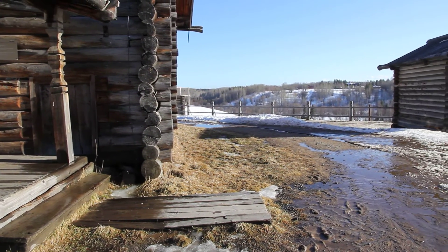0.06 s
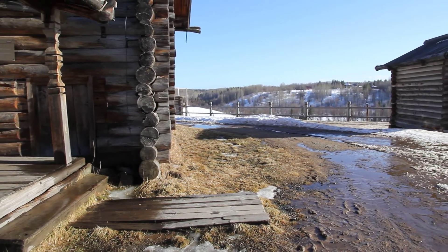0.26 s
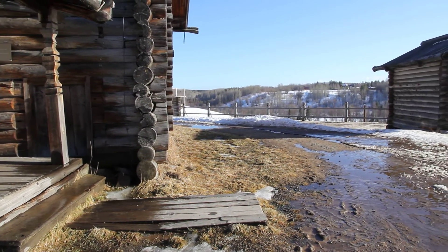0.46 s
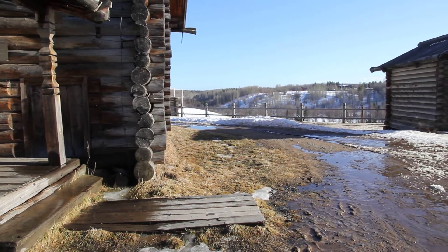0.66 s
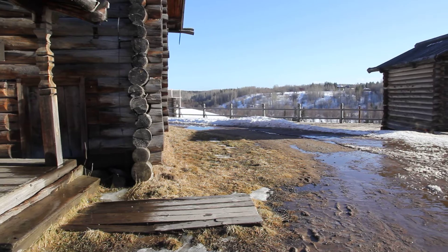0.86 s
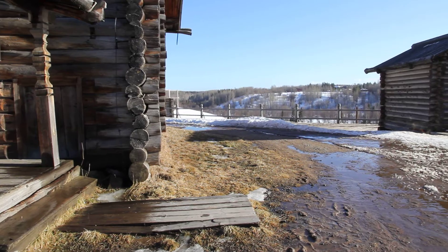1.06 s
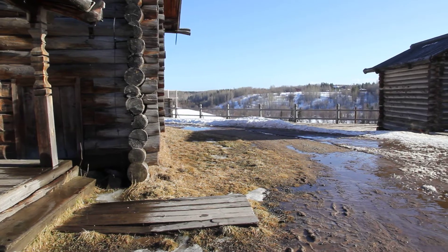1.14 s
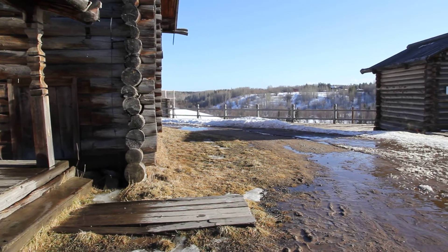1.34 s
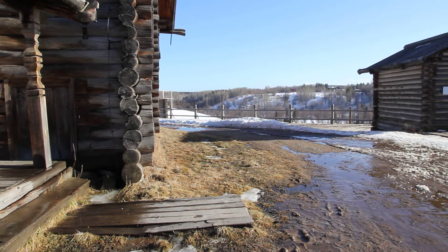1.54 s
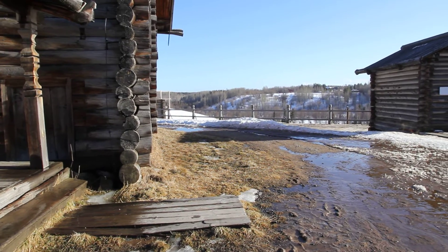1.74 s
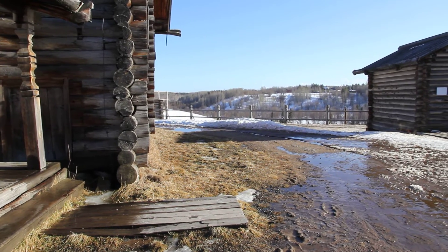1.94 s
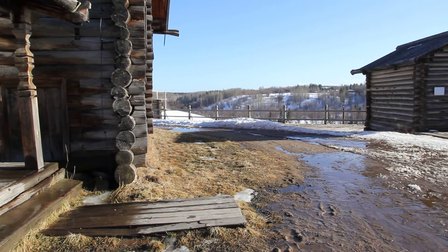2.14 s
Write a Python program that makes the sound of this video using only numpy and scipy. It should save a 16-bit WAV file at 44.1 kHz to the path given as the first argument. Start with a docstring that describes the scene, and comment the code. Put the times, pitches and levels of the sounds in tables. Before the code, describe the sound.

Water drips irregularly throughout, with sharp little taps on wet boards and soft splashes on soaked ground, over a fine patter and faint outdoor hiss. From about 0.2 to 0.9 seconds a gust buffets the microphone, with one loud dull pop near 0.5 seconds, then eases to a low rumble. The drips continue, the clearest taps falling around 1.2, 1.5, 1.9 and 2 seconds.

```python
"""Meltwater in a muddy yard

Water drips from the roof of a log building. Near drops tap sharply on wet boards, which ring briefly;
others splash softly on soaked ground, amid a fine patter of droplets. In the first second a gust
buffets the microphone, with one dull pop, then eases to a low rumble. Faint open-air hiss lies behind."""
import sys
import numpy as np
from scipy import signal
from scipy.fft import rfft, irfft, next_fast_len
from scipy.io import wavfile
from scipy.ndimage import uniform_filter1d, map_coordinates

SR = 44100
rng = np.random.default_rng(int(sys.argv[2]) if len(sys.argv) > 2 else 0)


def inscribe(sig):
    """Save sig as 16-bit PCM at rate SR to the path in sys.argv[1].

    A 1-D sig is mono; a 2-D sig holds one channel per row.
    Samples are clipped to [-1, 1] before scaling.
    """
    pcm = np.round(np.clip(np.atleast_2d(sig).T, -1, 1) * 32767)
    wavfile.write(sys.argv[1], SR, pcm.astype(np.int16))


N = 97020  # 2.2 s


def amp(db):
    return 10 ** (np.asarray(db) / 20)


def unit_rms(x):
    return x / np.sqrt(np.mean(x ** 2) + 1e-20)


def colour(points):
    """An EQ curve through (Hz, dB) points on a log axis."""
    freqs, gains_db = np.transpose(points)
    return lambda hz: amp(np.interp(np.log(hz + 1), np.log(freqs + 1), gains_db))


def bell(hz, centre, octaves, edge=2):
    """A bell EQ on a log axis; a higher edge steepens its sides."""
    return np.exp(-.5 * np.abs(np.log2((hz + 1) / centre) / octaves) ** edge)


def filtered(x, gain):
    """x through the EQ curve gain(hz)."""
    size = next_fast_len(len(x) + 4096)
    return irfft(rfft(x, size) * gain(np.fft.rfftfreq(size, 1 / SR)), size)[:len(x)]


def noise(points, size):
    """Coloured noise of rms 1."""
    return unit_rms(filtered(rng.standard_normal(size), colour(points)))


def wobble(rate):
    """A smooth random curve, rate knots a second."""
    return map_coordinates(rng.standard_normal(N // 100), [np.arange(N) * rate / SR], mode="wrap")


def patchy(x, depth_db):
    """x with patches of random gain over pitch and time, at rms 1."""
    spectra = signal.stft(x, nperseg=256)[2]
    patches = uniform_filter1d(rng.standard_normal(spectra.shape), size=4, axis=0)
    patches = unit_rms(uniform_filter1d(patches, size=6, axis=1))
    return unit_rms(signal.istft(spectra * amp(depth_db * patches), nperseg=256)[1][:len(x)])


def droplets(per_s, size, spread_db=0.5):
    """Tiny impacts of scattered strength at random moments."""
    hits = rng.random(size) < per_s / SR
    polarity = np.sign(rng.standard_normal(size))
    strength = amp(spread_db * np.clip(rng.standard_normal(size), -2, 2))
    return unit_rms(hits * polarity * strength)


def add(out, start_s, x):
    """Mix x into out from start_s on."""
    i = int(np.clip(round(start_s * SR), 0, N - 1))
    out[i:i + len(x)] += x[:N - i]


# The tone of the open air. Each row: frequency in Hz, gain in dB.
AIR_EQ = [(180, -9), (300, -0.5), (593, -5), (737, -3.5), (1780, -11), (2250, -16.5), (3520, -17.5),
          (3760, -20.5), (8500, -24.5), (14500, -34), (16000, -35)]


def air():
    """A faint, gently shifting bed of hiss from the open yard."""
    return amp(-59.5) * patchy(noise(AIR_EQ, N), depth_db=2)


# The gust's contour. Each row: time in seconds, rumble level in dB.
GUST = [(0, -42), (.19, -44.5), (.25, -38.5), (.37, -41.5), (.45, -45), (0.491, -34), (.56, -33.5),
        (.66, -38.5), (.77, -41.5), (.87, -40), (.92, -47.5), (1.02, -44.5), (1.09, -53), (1.15, -48),
        (1.48, -49), (1.57, -47.5), (1.63, -49), (1.85, -50.5), (2.13, -50.5), (2.19, -39.5)]
# The tone of the deep rumble and of the smaller eddies. Each row: frequency in Hz, gain in dB.
RUMBLE_EQ = [(20, -25), (35, 0), (55, 1), (85, 2), (130, -1.5), (200, -8.5), (300, -16.5), (450, -26.5),
             (800, -42), (2000, -63.5)]
EDDY_EQ = [(60, 29), (150, 13), (270, -0.5), (380, -5.5), (500, -2), (800, -30.5), (1500, -33.5),
           (3000, -134)]


def wind():
    """Rumble on the microphone; smaller eddies grow faster as the gust rises."""
    eddy_growth, flicker_db = 1.62, 1.5
    rumble_db = np.interp(np.arange(N) / SR, *np.transpose(GUST))
    mean_db = rumble_db.mean()
    eddy_db = mean_db - 15.5 + eddy_growth * (rumble_db - mean_db)
    eddies = unit_rms(noise(EDDY_EQ, N) * amp(flicker_db * wobble(45)))
    return amp(rumble_db) * noise(RUMBLE_EQ, N) + amp(eddy_db) * eddies


# Low thumps of wind. Each row: time in seconds, level in dB, pitch in Hz, half length in seconds,
# turbulence relative to the push in dB.
BUFFET_CUES = [(0.216, -33, 112, 0.0035, -16), (.249, -30.5, 153, 0.0037, -39),
               (0.292, -35, 230, 0.0025, -30), (.4133, -24, 129.6, 0.0067, -25.5),
               (.4195, -35.5, 274, 0.0036, -38), (0.4842, -29, 111, 0.0031, -5.5),
               (0.6036, -30.5, 285, 0.0028, -3), (.6265, -24, 174, 0.003, -26),
               (.6602, -28, 223, 0.0034, -23), (0.713, -33, 193, 0.0061, -31),
               (0.744, -33, 157, 0.0057, -30), (.7790, -33.5, 123, 0.0075, -28),
               (0.871, -33.5, 139, 0.0046, -12), (1.566, -38, 73, .012, -31),
               (2.181, -40.5, 96, 0.0045, -9.5)]
# The tone of that turbulence. Each row: frequency in Hz, gain in dB.
TURBULENCE_EQ = [(100, 14), (300, 10), (600, 2), (950, -5), (1300, -33), (3000, -58)]


def buffets():
    """Single eddies shake the microphone: a cycle or two of pressure with turbulence on it."""
    out, t = np.zeros(N), np.arange(N) / SR
    turbulence = noise(TURBULENCE_EQ, N)
    for at, db, hz, half_length, turbulence_db in BUFFET_CUES:
        push = np.sin(2 * np.pi * hz * (t - at))
        swell = np.exp(-((t - at) / half_length - .5) ** 2)
        out += amp(db) * (push + amp(turbulence_db) * turbulence) * swell
    return out


# The pop's dull, bass-heavy tone. Each row: frequency in Hz, gain in dB.
POP_EQ = [(20, -14), (50, -15), (90, 6), (170, -1), (300, -1), (400, -5.5), (490, -15), (580, -12),
          (720, -26), (1200, -31), (1800, -37), (2400, -77), (4000, -83)]


def wind_pop():
    """At the gust's peak the pressure flips from suction to push."""
    kick = np.zeros(N)
    add(kick, start_s=.536, x=np.ones(1))
    flip = filtered(kick, lambda hz: -1j * colour(POP_EQ)(hz))  # 90 degree shift: a dip, then a peak
    return amp(-12) * flip / np.abs(flip).max()


# The patter's thin, bright tone. Each row: frequency in Hz, gain in dB.
PATTER_EQ = [(500, -83), (2000, -0.5), (5000, 2), (9000, -1), (16000, -14)]


def patter():
    """Faint droplets all along the eaves."""
    return amp(-71.5) * unit_rms(filtered(droplets(per_s=400, size=N), colour(PATTER_EQ)))


# Drops on wet ground. Each row: start in seconds, level in dB, attack in seconds, decay in seconds,
# band centre in Hz, band width in octaves.
SPLASH_CUES = [(.007, -49.5, 0.0025, 0.0093, 8100, 1.4), (0.085, -53.5, 0.0062, 0.009, 4900, 1.5),
               (0.129, -51.5, 0.0072, 0.025, 4540, 0.52), (.131, -63, 0.0023, 0.0054, 11000, 0.66),
               (0.28, -55.5, 0.016, 0.032, 5100, 0.46), (.297, -47.5, .002, 0.0057, 6700, 1.1),
               (0.566, -53.5, 0.0026, 0.021, 6000, 1.1), (.745, -62.5, 0.0025, 0.018, 7240, 0.63),
               (.821, -54.5, 0.0089, 0.04, 6600, 1.5), (.852, -52, 0.0028, 0.0083, 6960, .7),
               (0.981, -63.5, 0.0019, 0.0076, 6000, .5), (1.06, -60, 0.008, .005, 7140, .8),
               (1.226, -59, 0.0012, 0.023, 10000, 2.1), (1.264, -55, 0.0033, 0.0065, 8500, 0.38),
               (1.295, -48.5, 0.0056, 0.0047, 8100, .7), (1.413, -59, 0.0081, 0.037, 5530, 0.45),
               (1.441, -57.5, 0.015, 0.014, 8100, 0.22), (1.575, -57.5, 0.0075, 0.0058, 6700, .6),
               (1.643, -57, 0.0021, 0.037, 1920, 0.83), (1.68, -57, .012, 0.015, 6500, 0.35),
               (1.814, -58.5, 0.005, .012, 7300, 0.61), (1.927, -63, 0.013, 0.017, 7900, .28),
               (2.052, -60, 0.0026, 0.0074, 6000, 0.62), (2.128, -62.5, 0.014, 0.012, 4960, 1),
               (2.166, -51.5, 0.0019, .011, 5560, 0.67)]


def splashes():
    """A drop bursts on soaked ground into a swelling, fading shower of droplets."""
    mist_share, skirt_db, lowpass_hz = 0.2, -12, 13600
    out, t = np.zeros(N), np.arange(SR // 4) / SR
    for start, db, attack, decay, centre, octaves in SPLASH_CUES:
        grains = np.sqrt(1 - mist_share) * droplets(per_s=1100, size=len(t))
        mist = np.sqrt(mist_share) * rng.standard_normal(len(t))
        tone = lambda hz: (bell(hz, centre, octaves) + amp(skirt_db)) / np.sqrt(1 + (hz / lowpass_hz) ** 10)
        shower = patchy(filtered(grains + mist, tone), depth_db=3.5)  # droplets cluster in pitch and time
        envelope = np.minimum(t / attack, 1) * np.exp(-np.maximum(t - attack, 0) / decay)
        add(out, start, amp(db) * shower * envelope)
    return out


# Drops on boards. Each row: start in seconds, level in dB, ring pitch in Hz, ring relative to the
# crack in dB, ring width in octaves, crack decay in milliseconds.
TAP_CUES = [(0.0682, -44, 5800, 3, 0.029, 0.81), (.0812, -46.5, 4800, 2, 0.29, 2),
            (0.2097, -52.5, 6230, 11.5, 0.5, 0.53), (0.2995, -54.5, 4150, 6, 0.34, 1.8),
            (.3655, -57, 7440, 3, 0.13, 0.55), (0.4572, -44.5, 2530, -26, 0.15, 1.65),
            (0.4951, -51.5, 3970, -6, 0.64, 0.23), (.6560, -56.5, 4630, -1, 0.16, 3.1),
            (0.8188, -44, 1950, 1, 0.58, 1.3), (0.8585, -52.5, 5340, 1, 0.44, 6.3),
            (0.9429, -51.5, 6100, -0.5, 0.52, 0.53), (0.9784, -51, 4640, -0.5, 0.24, 0.73),
            (1.1625, -45, 7000, -17, .3, 0.19), (1.1883, -40.5, 9900, -8, 0.65, 1.06),
            (1.5477, -40.5, 4100, -13, .08, 1.18), (1.617, -55, 2600, 1.5, 0.26, .6),
            (1.7679, -44.5, 4200, 1.5, .2, 0.5), (1.7672, -47.5, 12700, 6, 0.48, 0.71),
            (1.775, -51, 8100, 1, 0.48, 1.1), (1.9208, -38, 2610, 7, 0.41, 0.56),
            (1.9775, -55.5, 1230, 8.5, 1, 2.8), (2.0424, -40, 5840, 3.5, 0.56, 0.68),
            (2.051, -50, 7100, 2, 0.35, 1.7)]
# The broad tone of crack and spray. Each row: frequency in Hz, gain in dB.
CRACK_EQ = [(300, -32), (1000, -2.5), (2500, -2), (5000, -4), (9000, -4), (12000, -7), (16000, -15.5)]


def taps():
    """A drop slaps a wet board: a crack, a ring of a few cycles and a puff of spray."""
    attack_ms, ring_lag_ms = .15, 0.495
    spray_db, spray_decay_s = -15, 0.014
    out, t = np.zeros(N), np.arange(SR // 10) / SR
    ms = 1000 * t
    push = np.sinc((ms - ring_lag_ms) / ms[1])  # the board answers just after contact
    for start, db, ring_hz, ring_db, octaves, decay_ms in TAP_CUES:
        envelope = (1 - np.exp(-ms / attack_ms)) * np.exp(-ms / decay_ms)
        envelope /= envelope.max()
        crack = unit_rms(noise(CRACK_EQ, len(t)) * envelope)
        ring = unit_rms(filtered(push, lambda hz: bell(hz, ring_hz, octaves, edge=2.8)))
        spray = noise(CRACK_EQ, len(t)) * np.exp(-t / spray_decay_s)
        slap = np.sqrt(np.mean(envelope ** 2)) * (crack + amp(ring_db) * ring)
        add(out, start, amp(db) * (slap + amp(spray_db) * spray))
    return out


def scene():
    """Drips, wind and air in one mono mix."""
    return (taps() + splashes() + patter() + wind() + buffets() + wind_pop() + air())[None]


def record(dry):
    """A brick-wall high cut at 16 kHz."""
    return np.array([filtered(x, lambda hz: hz < 16000) for x in dry])


dry = scene()
out = record(dry)
inscribe(out)
```